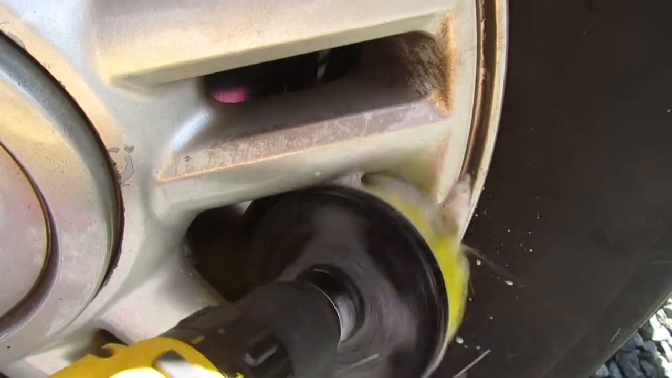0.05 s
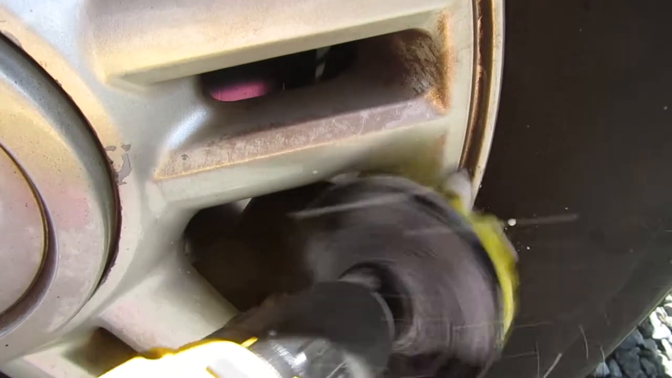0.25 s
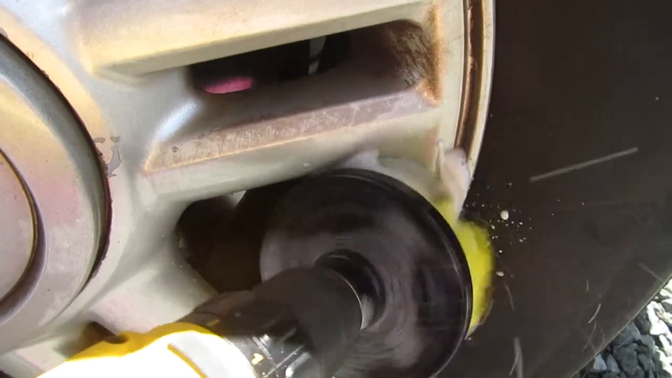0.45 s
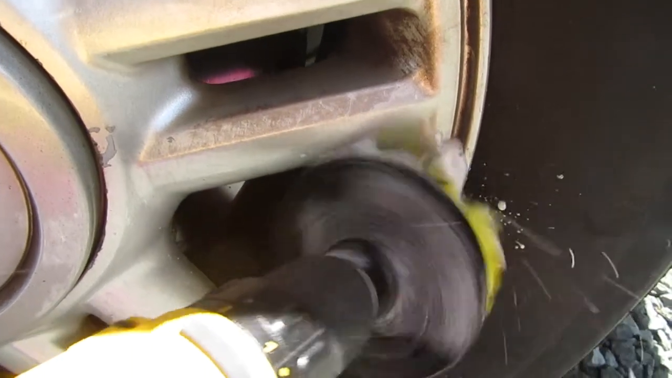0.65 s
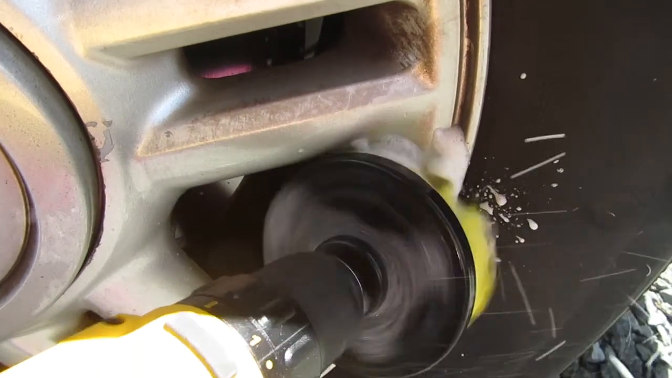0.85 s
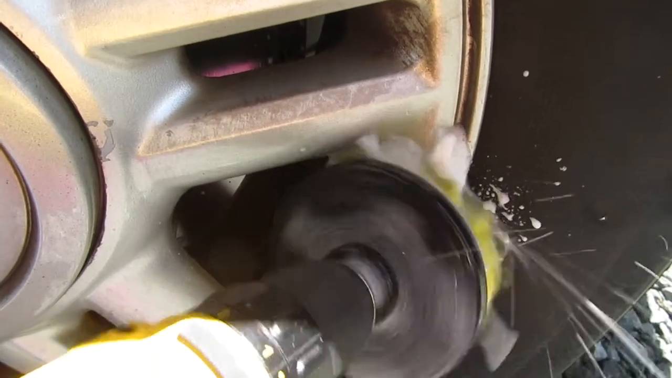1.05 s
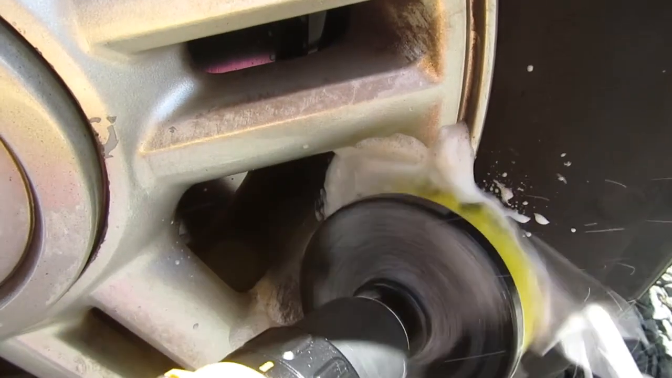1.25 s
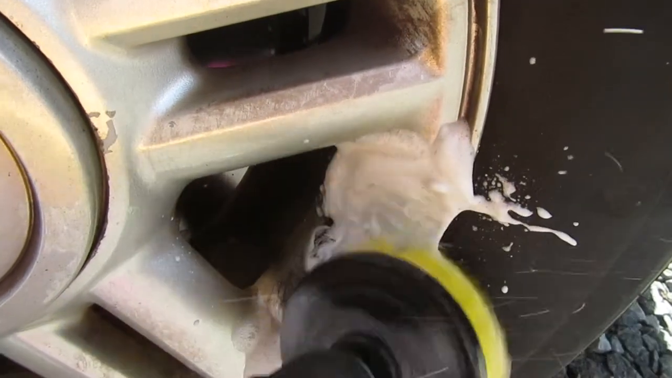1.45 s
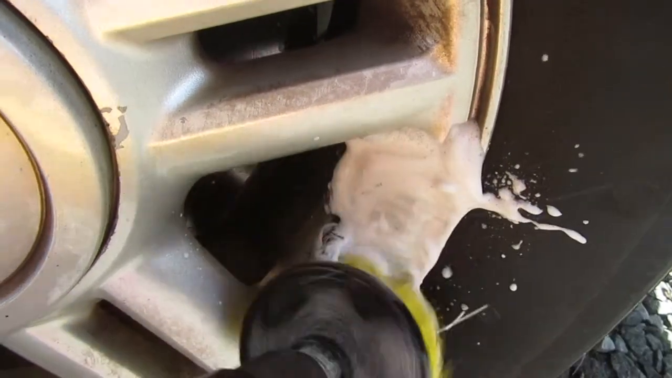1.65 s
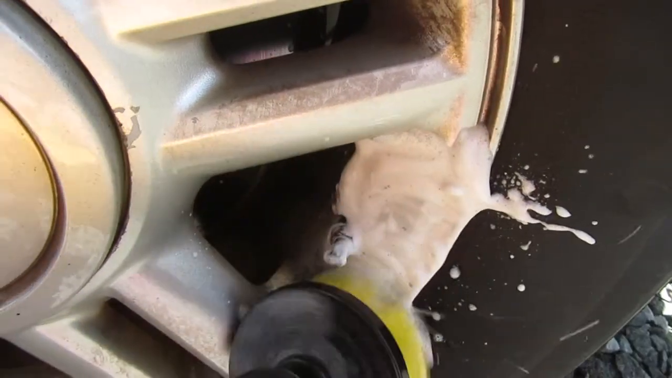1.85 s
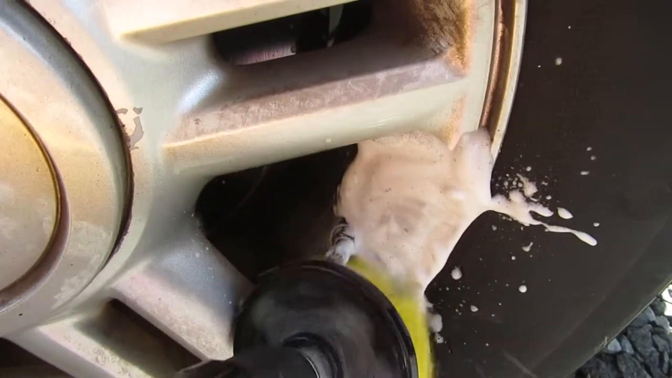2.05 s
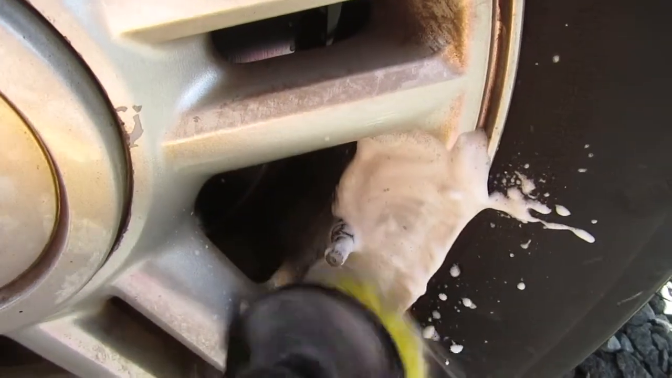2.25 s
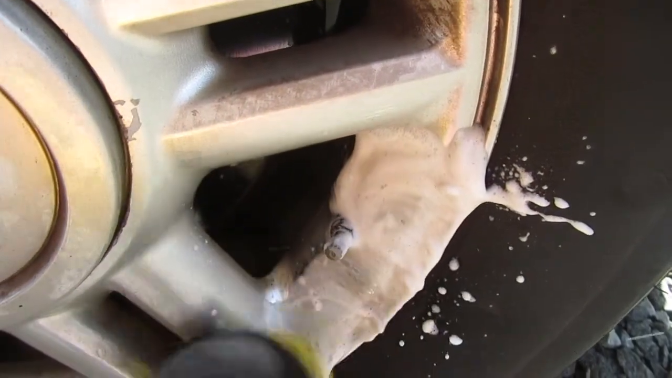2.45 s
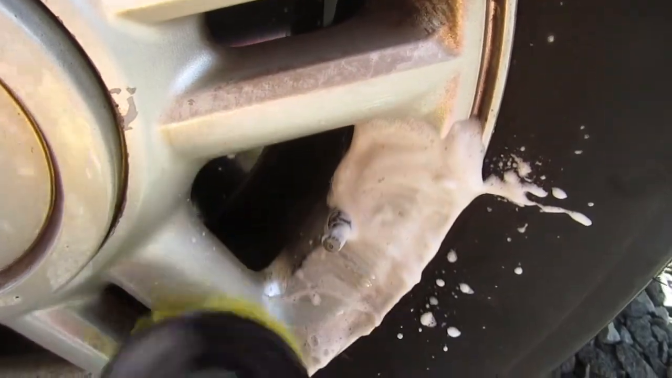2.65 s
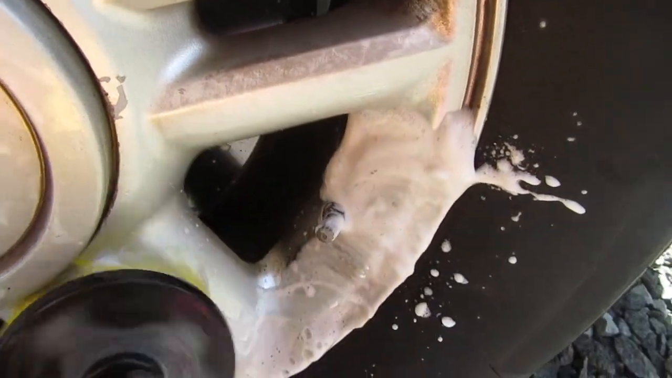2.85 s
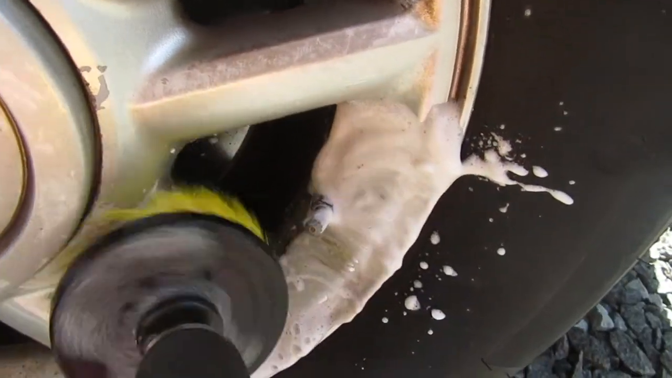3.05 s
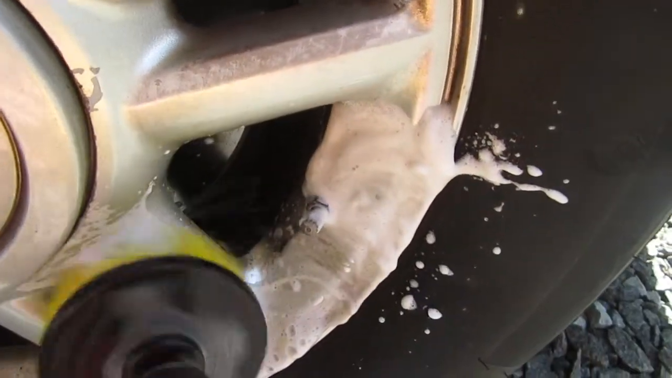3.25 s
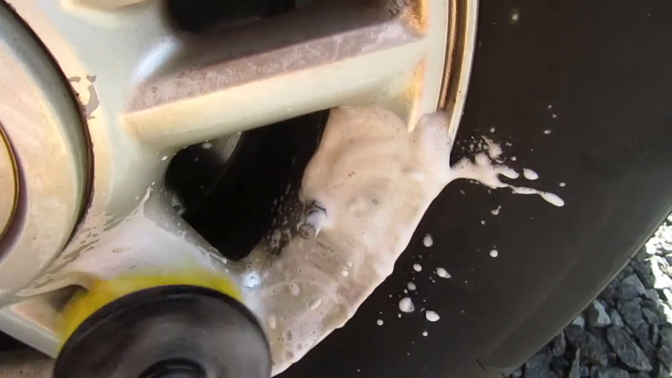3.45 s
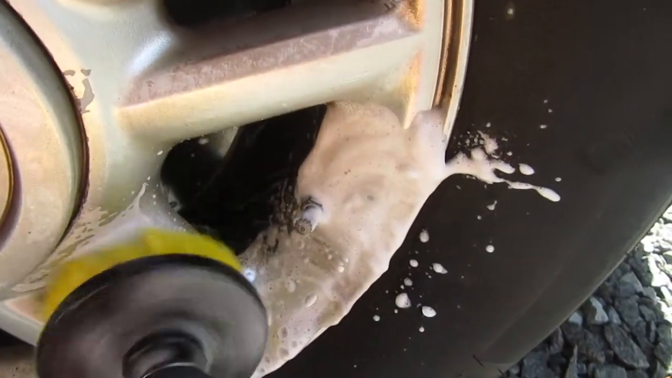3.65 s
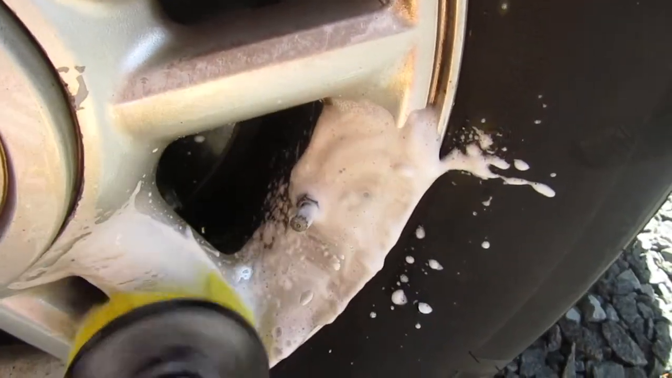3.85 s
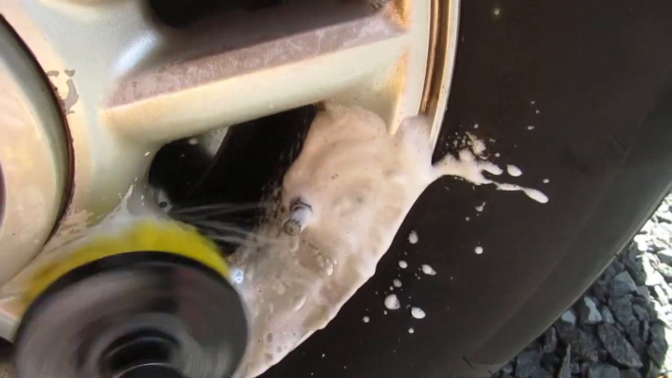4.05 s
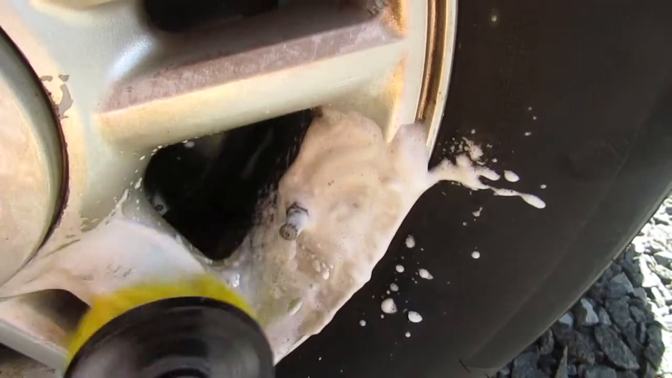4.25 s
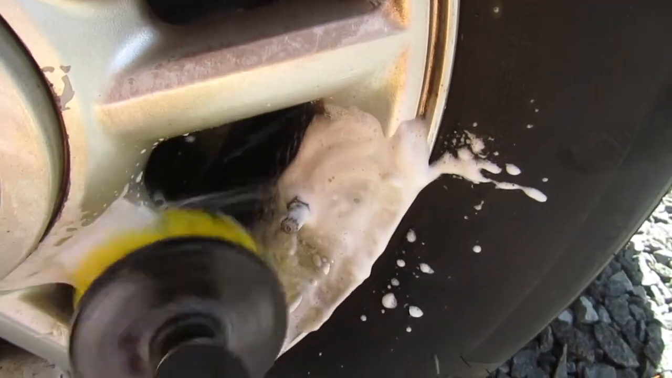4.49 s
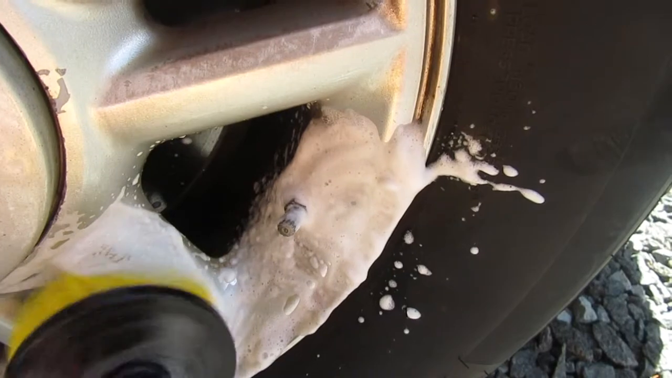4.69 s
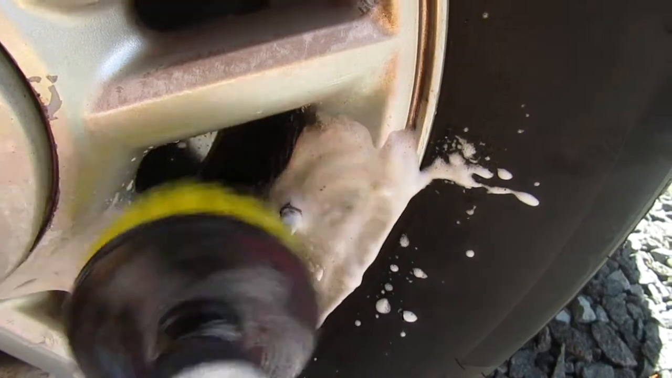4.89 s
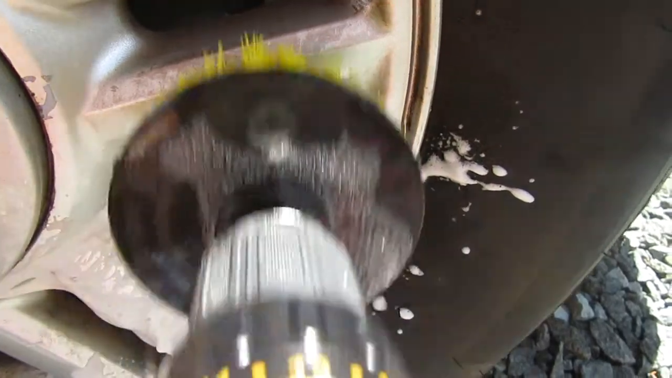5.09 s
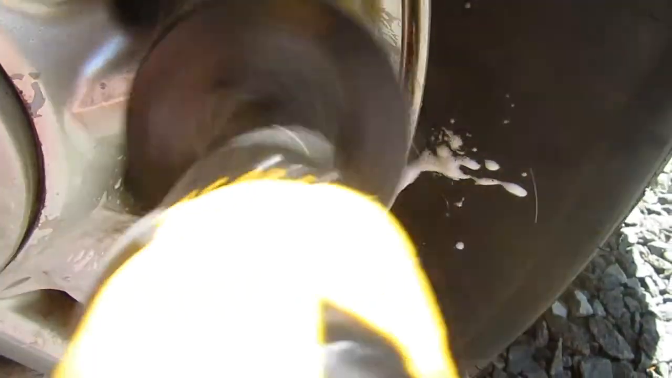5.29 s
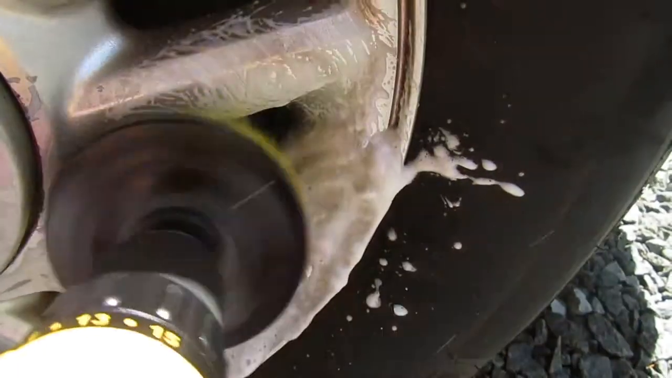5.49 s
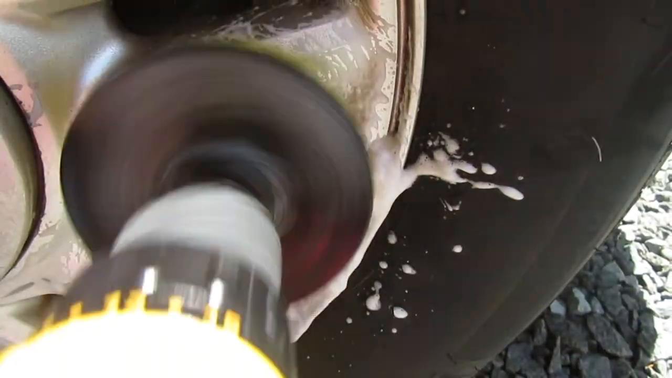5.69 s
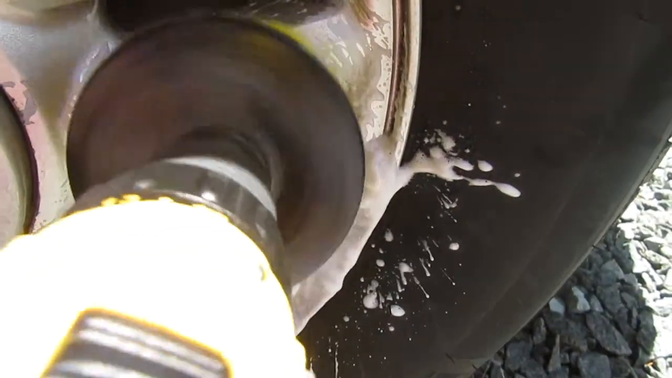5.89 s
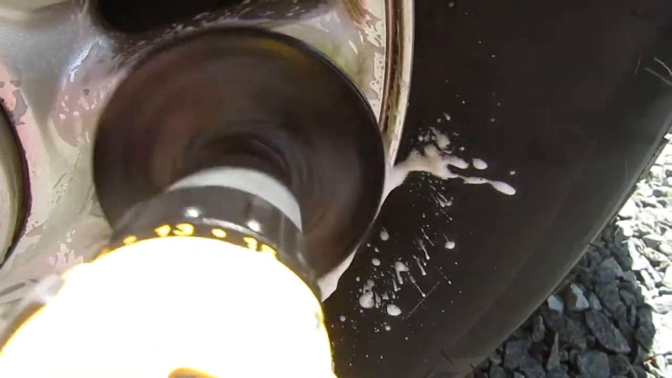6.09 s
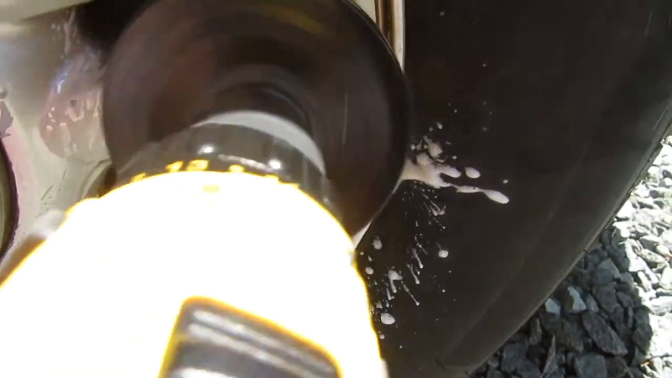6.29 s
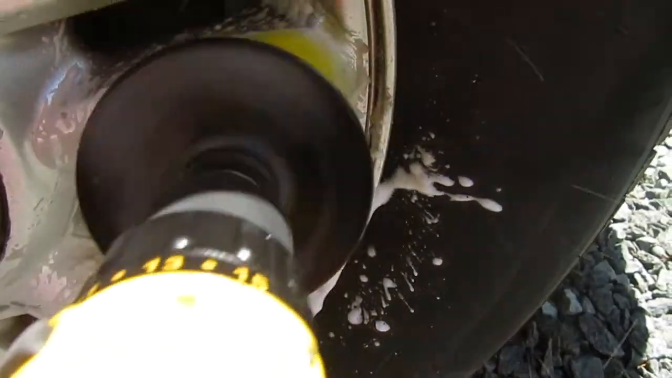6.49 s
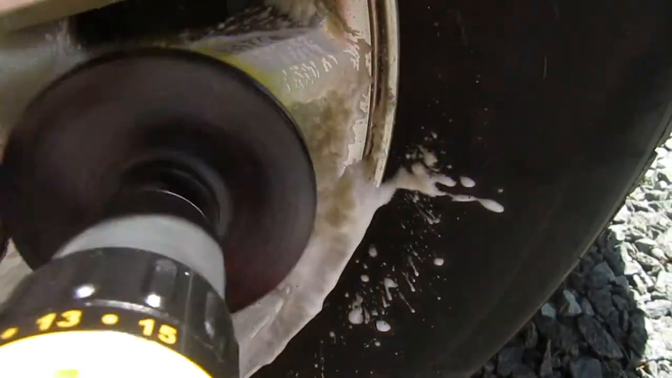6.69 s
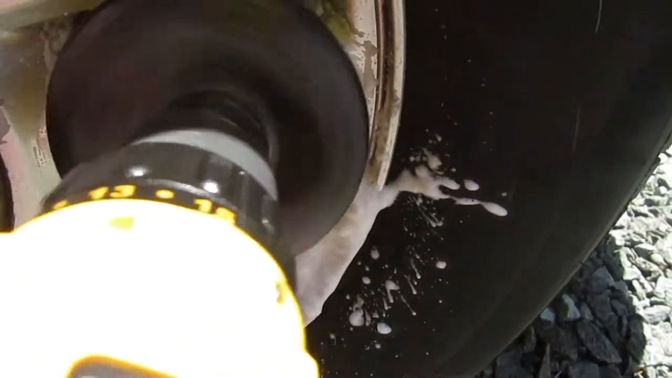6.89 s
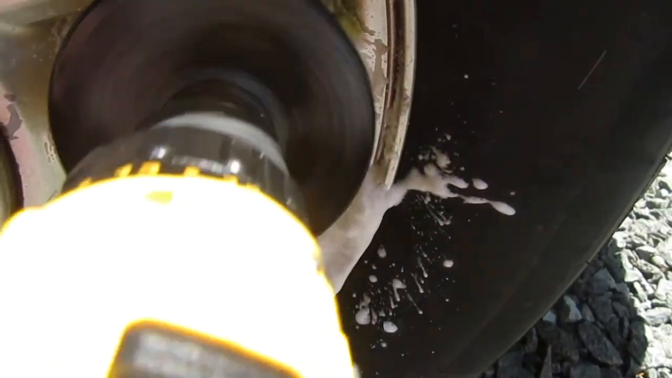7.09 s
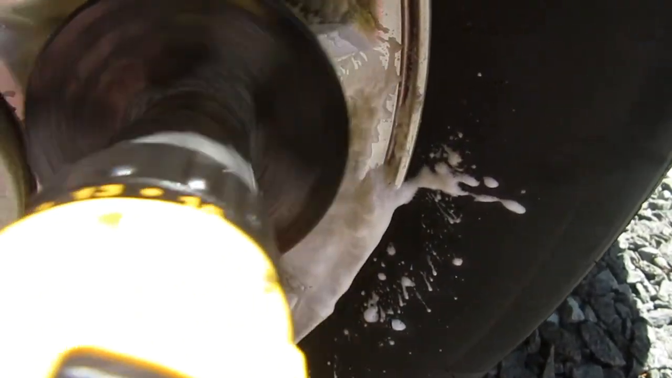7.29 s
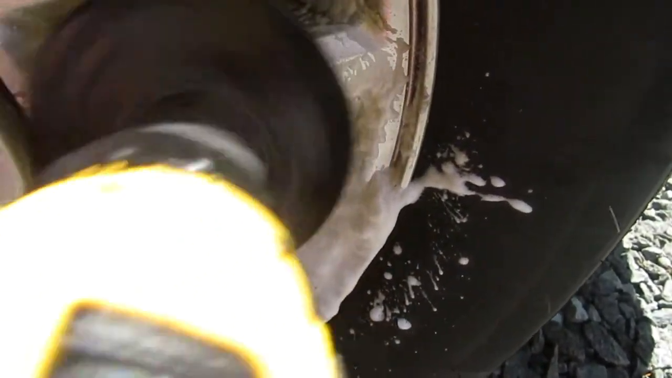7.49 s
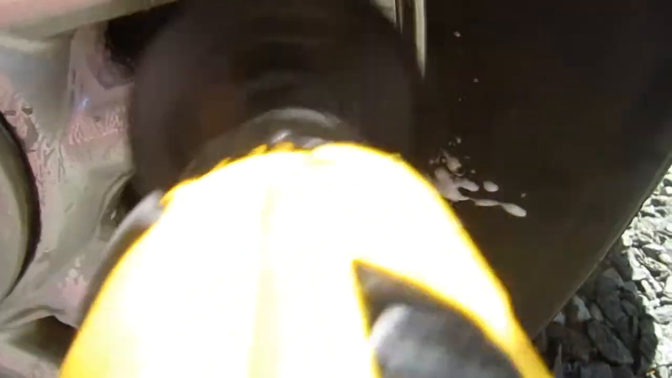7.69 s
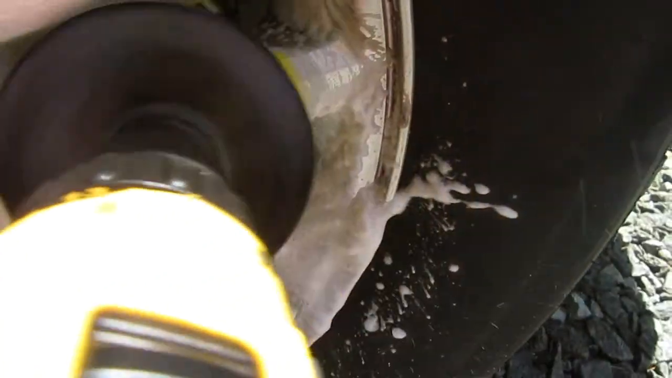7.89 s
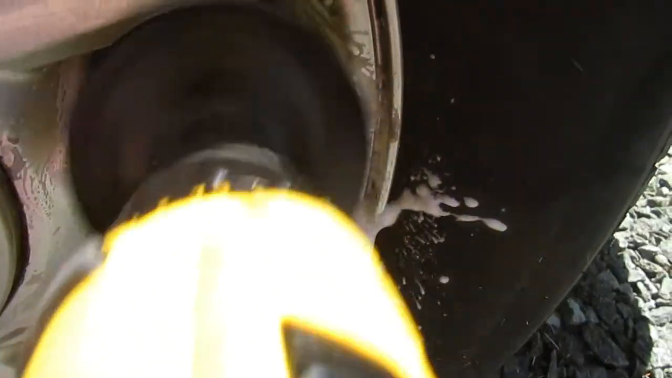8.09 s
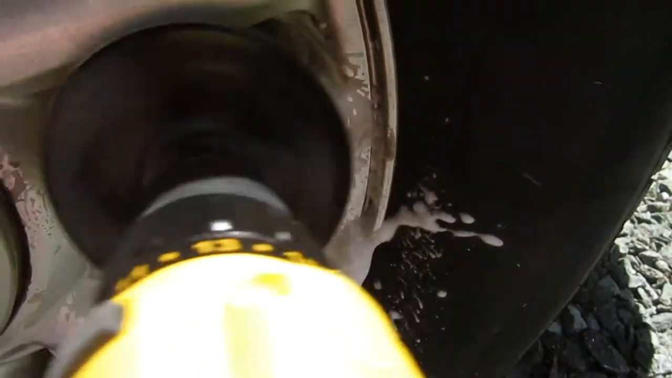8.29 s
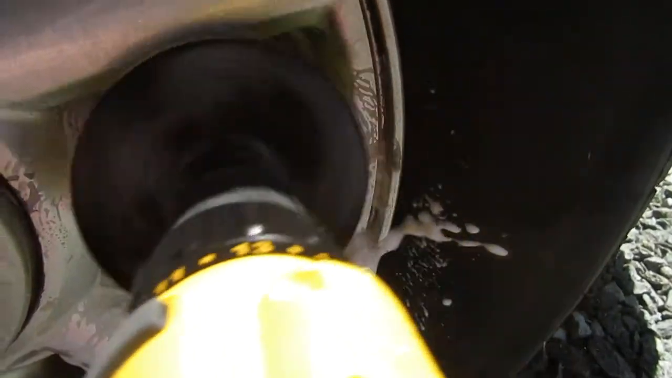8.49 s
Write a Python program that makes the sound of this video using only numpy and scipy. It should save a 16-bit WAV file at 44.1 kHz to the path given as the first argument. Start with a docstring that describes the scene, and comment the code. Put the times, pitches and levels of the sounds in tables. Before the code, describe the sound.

Close to the microphone in a quiet yard, a cordless drill whines over rough gear rattle while wet bristles scrub a car wheel. The pitch sags and climbs with the load, with dry snaps and dull wheel knocks. Near five seconds it suddenly hushes, then restarts higher and steadier, dips once, recovers, and ends with low air buffeting the microphone.

```python
"""A cordless drill spins a wet bristle brush on a soapy car wheel, close to a microphone, over a quiet yard bed.
First the shaft and planet gears whine with motor speed over gear rattle and bristle scrub; knocks ring the wheel.
Just before 5 s the trigger is let go, the drill hushes and a puff of its cooling air hits the microphone.
The speed control sings at 5.15 s; the drill picks up turned away, a second puff follows, a knock lands near 7.6 s.
From 8.38 s the air buffets the microphone in lumpy low noise with sharp slaps."""
import sys
import numpy as np
from scipy import signal
from scipy.fft import rfft, irfft, next_fast_len
from scipy.io import wavfile
from scipy.ndimage import uniform_filter1d, map_coordinates

SR = 44100
rng = np.random.default_rng(int(sys.argv[2]) if len(sys.argv) > 2 else 0)


def dump_mix(stems):
    """Bounce the given channels to the path in sys.argv[1] as a 16-bit WAV at rate SR."""
    frames = np.atleast_2d(stems).T  # one column per channel
    limited = np.clip(frames, -1, 1)  # hard clip at full scale
    pcm = np.round(limited * 32767).astype(np.int16)
    wavfile.write(sys.argv[1], SR, pcm)


N = 376613
T = np.arange(N) / SR

# yard bed, spectrum shape: (f/Hz, relative level/dB)
YARD_SPECTRUM = [(18, -33), (30, -5), (132, -14), (800, -12), (3000, -27.5), (3700, -32), (15000, -35)]
# cooling-air puffs: (t/s, length/s, level/dB)
AIR_PUFFS = [(4.995, .02, -37), (5.284, 0.023, -30)]
# eddies slapping the membrane: (t/s, relative level/dB)
EDDIES = [(8.416, 0), (8.427, -9), (8.437, -4), (8.443, 1), (8.447, 6), (8.469, 0), (8.473, -2),
          (8.477, -7), (8.493, -3), (8.507, -2)]
# buffeting air, spectrum shape: (f/Hz, relative level/dB)
BUFFET_SPECTRUM = [(30, -17), (120, 2.5), (300, -1.5), (1100, -10.5), (2000, -30), (4000, -63)]
# resonances of wheel and tyre: (f/Hz, width/Hz, level/dB)
WHEEL_MODES = [(60, 16, -19), (140, 38, -3), (311, 16, -3.5), (498, 58, -0.5)]
# brush disc knocking the wheel: (t/s, relative level/dB, wheel ring above it/dB)
WHEEL_KNOCKS = [(.39, -17, -2), (1.778, -33, 20), (2.065, -26, 2), (7.621, -14.5, 7)]
# bristles snapping over an edge, and trigger clicks: (t/s, relative level/dB)
SNAP_TIMES = [(0.3974, -7), (0.4589, 4.5), (0.5511, -4), (0.836, -9), (1.0045, 1), (1.0997, 3), (1.1554, 2),
              (1.1844, 0), (1.2014, -5), (1.4103, 2.5), (1.778, -5), (2.0692, 3), (4.9714, -14),
              (4.9834, -8), (5.1108, -34)]
# tone colour of a bristle snap: (f/Hz, gain/dB)
SNAP_RESPONSE = [(500, -44), (1300, 7.5), (3000, -0.5), (7000, -2), (15000, -14)]
# switching tones of the speed control: (f/Hz, relative level/dB)
CHOPPER_TONES = [(3946, -43), (7897, -46)]
# wheel drone, loud while the brush presses on the rim: (t/s, level/dB)
DRONE_LEVEL = [(0, -40.5), (1.4, -46.5), (1.55, -55), (1.75, -62), (1.79, -38.5), (2.3, -40), (2.5, -51.5),
               (4.9, -51.5), (5.25, -40.5), (5.6, -54), (7.3, -50.5), (7.9, -45), (8.54, -47)]
# bristle scrub, spectrum shape: (f/Hz, relative level/dB)
SCRUB_SPECTRUM = [(180, -47), (300, -18.5), (800, -6.5), (1200, -7.5), (1860, -1.5), (3500, -4.5),
                  (5000, -10), (6500, -25), (11000, -120)]
# motor shaft before smoothing: (t/s, turns f/Hz)
SHAFT_SPEED = [(0.0, 181), (0.5, 150.3), (0.71, 148.1), (0.89, 174.2), (1.06, 189.1), (1.22, 183.4),
               (1.4, 197.4), (1.5, 180), (1.68, 163.4), (2.1, 151.8), (2.2, 163.2), (2.41, 229.6),
               (2.52, 241.4), (2.73, 220.5), (2.94, 137), (3.05, 103.9), (3.25, 186.7), (3.4, 220.7),
               (3.78, 253.2), (3.95, 245.7), (4.21, 253.6), (4.52, 260), (4.63, 253.1), (4.81, 265),
               (4.88, 250), (4.94, 222), (4.99, 131), (5.18, 109.7), (5.225, 250), (5.26, 336),
               (5.3, 374.5), (5.5, 391.2), (5.75, 402), (5.9, 363.7), (6.05, 348), (6.33, 353),
               (6.85, 341.3), (7.09, 223), (7.25, 151.8), (7.31, 134.8), (7.37, 185), (7.49, 297.5),
               (7.74, 381.5), (7.84, 389), (8.54, 385)]
# work: (t/s, rattle level at reference speed/dB, scrub above rattle/dB,
# first gear stage above rattle/dB, second stage above rattle/dB)
WORKLOAD = [(0, -20, -4.5, 4.5, -18), (0.37, -18.5, -1, 4.5, -17), (0.65, -19.5, 0, -2, -24),
            (1.0, -18, -0.5, 4.5, -15), (1.22, -17.5, -1, 4.5, -15), (1.42, -19, -3.5, 2, -18),
            (1.54, -23, -8.5, 1, -15), (2.1, -18, -5, -1.5, -15), (2.4, -21, -14, -1.5, -17.5),
            (2.8, -20.5, -9, -4, -24), (3.2, -15.5, -8.5, -1, -21), (3.5, -16, -11.5, -1, -17),
            (4.0, -16.5, -10.5, -1, -20), (4.78, -18, -15, -1, -18.5), (4.9, -17.5, -13.5, -10, -22),
            (5.22, -14.5, -8, -6, -24), (5.35, -18.5, -11, 0, -21.5), (5.58, -20.5, -14, -6.5, -21),
            (5.85, -20.5, -10.5, -0.5, -25), (6.2, -20, -9.5, 1, -19), (6.6, -19, -9.5, 1.5, -17),
            (6.9, -18.5, -12.5, 0, -16.5), (7.15, -17.5, -11, -2, -19), (7.6, -17.5, -10.5, -0.5, -22),
            (8.2, -22.5, -10.5, 3.5, -17), (8.41, -20.5, -10.5, -4, -22), (8.54, -29, -15, 1, -16)]
# shoves of the brush against the wheel: (t/s, length/s, rattle boost/dB)
BRUSH_SHOVES = [(0.397, 0.078, 3.5), (.84, 0.044, 1), (2.28, 0.064, 6), (2.49, 0.084, 5.5),
                (2.85, 0.057, 3.5), (3.313, .1, 1.5), (3.843, .1, 1.5), (4.12, .05, 0.5),
                (4.566, 0.064, 2.5), (4.807, .06, 2.2), (5.36, .08, 2), (5.847, 0.064, 4),
                (6.03, 0.039, 1.5), (6.42, 0.087, 2.5), (6.664, 0.049, 1.5), (7.46, 0.049, 3),
                (7.654, 0.097, 2.5), (8.082, 0.066, 4)]
# gear rattle, drill seen from the side, spectrum shape: (f/Hz, relative level/dB)
RATTLE_SIDE = [(900, -24.5), (1500, -12), (2000, -15.5), (2700, -7.5), (3500, -8.5), (5500, -2.5),
               (7700, -4.5), (12700, -12.5), (15200, -19.5)]
# gear rattle, drill turned away, spectrum shape: (f/Hz, relative level/dB)
RATTLE_AWAY = [(900, -25.5), (1500, -10.5), (3000, -10.5), (4300, -4), (5200, -3), (6600, -3), (8800, -7),
               (12900, -15.5), (15200, -23)]
# shaft orders: (multiple of shaft speed, offset/dB, offset turned away/dB, flutter/dB)
SHAFT_ORDERS = [(1, 2.5, 3, 2.2), (2, -22, -8, 3.5), (3, -3, -4, 2.5), (4, -8.5, -5.5, 3)]
# housing resonance under the shaft orders: (f/Hz, level above rattle/dB)
HOUSING = [(100, -67), (200, -34), (380, -26), (480, -26), (640, -15.5), (800, -25), (950, -35.5),
           (1150, -23.5), (1400, -18), (1600, -26)]
# second gear stage: (multiple of its tooth rate, relative level/dB)
SECOND_STAGE = [(2, -1.5), (3, 0), (4, -0.5), (5, -7), (6, -13)]
# how the gear case passes a gear line: (f/Hz, gain/dB)
CASE_RESPONSE = [(1300, 2), (1650, -2), (2000, 1.5), (2400, -2.5), (2800, -0.7), (3400, -4), (4200, 2.5),
                 (4800, 2.5), (5500, 2.5), (6500, -3), (8500, 3)]
# rotor slots and fan blades: (multiple of shaft speed, level above rattle/dB)
ROTOR_LINES = [(15, -32), (18, -30), (20, -38), (29, -27)]
# housing resonances that fast teeth excite: (f/Hz, relative level/dB)
VENT_MODES = [(7150, -12), (8800, -15.5), (12500, -25)]

# events per shaft turn: teeth meeting, planets passing, the carrier's beat, second-stage teeth
MESH, PLANET, CARRIER, SECOND_MESH = 10.83, 0.635, 0.367, 3.1
# gear lines: (relative level/dB, relative level turned away/dB)
MESH_DB, PLANET_DB, OVERTONE_DB, THIRD_DB = (-13, -16), (-16, -11.5), (-13, -12.5), (-12.5, -30)
PLANET_FULL_HZ = 260  # shaft speed from which the planets sing fully
TEETH_PULL = 0.08  # share of the current surge that loads the teeth
INERTIA_S = 0.03  # the rotor rounds off every change of speed
REFERENCE_HZ, RATTLE_DB_PER_OCTAVE = 250, 3.5  # faster gears rattle louder
RELEASE_S, BRAKE_DB_PER_S = 4.945, 598  # trigger let go
PICKUP_S, RISE_DB_PER_S = 5.21, 676  # drill picks up again
STILL_DB, SCRUB_LINGERS_DB = -46.5, 16  # drop of the rattle; bristles still drag while gears are quiet
SIDE_ON = T < 5.1  # afterwards the drill is turned away
BUFFET_S, BUFFET_ATTACK_S, BUFFET_DB, BUFFET_FADE_DB_PER_S = 8.38, 0.043, -13.5, 65
YARD_DB = -50.5
TOP_HZ = 15080


def amp(db):
    """Gain of a level in dB."""
    return 10 ** (np.asarray(db) / 20)


def unit(x):
    """x at rms 1."""
    return x / np.sqrt(np.mean(np.abs(x) ** 2) + 1e-20)


def along(points, hz):
    """(f/Hz, value) points read on a log frequency axis."""
    f, value = np.transpose(points)
    return np.interp(np.log(hz + 1), np.log(f + 1), value)


def curves(rows):
    """One value per sample for each column after the time."""
    s, *columns = np.transpose(rows)
    return [np.interp(T, s, column) for column in columns]


def wobble(rate):
    """A smooth random curve, rate knots a second."""
    knots = rng.standard_normal(int(N * rate / SR) + 4)
    return map_coordinates(knots, [T * rate], order=2)


def filtered(x, response):
    """x shaped by a response of frequency."""
    m = next_fast_len(N + SR // 2)
    return irfft(rfft(x, m) * response(np.fft.rfftfreq(m, 1 / SR)), m)[:N]


def noise(spectrum, patchy_db):
    """Coloured noise of rms 1 with time-frequency patches of random gain."""
    grid = signal.stft(rng.standard_normal(N + 512), nperseg=512)[2]
    patches = uniform_filter1d(rng.standard_normal(grid.shape), 8, 0)
    patches = unit(uniform_filter1d(patches, 10, 1))
    white = signal.istft(grid * amp(patchy_db * patches), nperseg=512)[1][:N]
    return unit(filtered(white, lambda hz: amp(along(spectrum, hz))))


def bumps(rows):
    """Gaussian swells: one pair of (centre, length) and a height per row."""
    return sum(height * np.exp(-((T - s) / length) ** 2) for s, length, height in rows)


def yard():
    """Steady coloured noise as the outdoor bed."""
    return amp(YARD_DB) * noise(YARD_SPECTRUM, patchy_db=0.5)


def puffs():
    """Cooling air puffs as short swells of low thump on the microphone."""
    thump = noise([(25, -0.5), (90, -7), (200, -8), (500, -40)], patchy_db=3.5)
    return thump * bumps([(s, length, amp(db)) for s, length, db in AIR_PUFFS])


def buffeting():
    """Lumpy air noise swells fast and fades slowly on the microphone."""
    attack = np.clip((T - BUFFET_S) / BUFFET_ATTACK_S, 0, 1) ** 2
    fade_s = np.clip(T - BUFFET_S - BUFFET_ATTACK_S, 0, 1)
    blowing = attack * amp(BUFFET_DB - BUFFET_FADE_DB_PER_S * fade_s)
    return blowing * unit(amp(1.8 * wobble(150)) * noise(BUFFET_SPECTRUM, patchy_db=1.0))


def slaps():
    """Single eddies slap the membrane: a steep push, then a slower suck."""
    out = np.zeros(N)
    u = np.arange(SR // 100) / SR / 0.00022  # time in units of 0.22 ms
    shape = u * (1 - u / 4) * np.exp(-u / 1.53)
    for s, db in EDDIES:
        out[round(s * SR):][:len(u)] += amp(db + 6.5) * shape
    return out


def wheel(hz):
    """Response of the wheel and tyre as resonances of alternating sign."""
    response = 0
    for k, (centre, width, db) in enumerate(WHEEL_MODES):
        damping = 1j * hz * width
        response = response + (-1) ** k * amp(db) * damping / (centre ** 2 - hz ** 2 + damping)
    return response


def snap_response(hz):
    """Gain that colours bristle snaps."""
    return amp(along(SNAP_RESPONSE, hz))


def knocks():
    """Decaying noise blows give a dull thud and ring the wheel."""
    thuds, rings, t = np.zeros(N), np.zeros(N), np.arange(SR // 20) / SR
    for s, db, ring_db in WHEEL_KNOCKS:
        blow = amp(db + 16 - 60 * t / 0.017) * rng.standard_normal(len(t))  # 60 dB down in 17 ms
        thuds[round(s * SR):][:len(t)] += blow
        rings[round(s * SR):][:len(t)] += amp(ring_db) * blow
    dull = lambda hz: 1 / (1 + 1j * hz / 900) ** 2
    return filtered(thuds, dull) + filtered(rings, wheel)


def ticks():
    """Bristle snaps and trigger clicks as dry bursts, 60 dB down in 12 ms."""
    snaps, t = np.zeros(N), np.arange(SR // 20) / SR
    for s, db in SNAP_TIMES:
        snaps[round(s * SR):][:len(t)] += amp(db - 6 - 60 * t / 0.012) * rng.standard_normal(len(t))
    return filtered(snaps, snap_response)


def chopper():
    """The speed control sings steady tones for a moment before the motor picks up."""
    on = np.interp(T, [5.148, 5.152, 5.175, 5.19], [0, 1, 1, 0])
    return on * sum(amp(db + 4) * np.sin(2 * np.pi * hz * T) for hz, db in CHOPPER_TONES)


def drone():
    """Unsteady noise through the wheel's resonances hums under the brush."""
    ringing = filtered(rng.standard_normal(N), wheel)
    return amp(curves(DRONE_LEVEL)[0]) * unit(amp(3.9 * wobble(30)) * ringing)


def scrub(press_db):
    """Bristle friction as noise that follows contact pressure, with dense flicked grains; rms 1."""
    flicks = (rng.random(N) < 90 / SR) * rng.standard_normal(N)  # about 90 a second
    flicks = unit(filtered(flicks, snap_response))
    friction = noise(SCRUB_SPECTRUM, patchy_db=1.4) + 0.28 * flicks
    return unit(amp(1.53 * press_db + 1.5 * wobble(150)) * friction)


def rattle(turns, press_db):
    """Gear noise that beats with planet passes, carrier and shaft turns; rms 1."""
    cycle = lambda multiple: np.cos(2 * np.pi * multiple * turns)
    beat_db = 1.2 * cycle(PLANET) + 0.59 * cycle(CARRIER) + 0.68 * cycle(1)
    side, away = noise(RATTLE_SIDE, patchy_db=1.5), noise(RATTLE_AWAY, patchy_db=1.35)
    return unit(amp(beat_db + press_db) * np.where(SIDE_ON, side, away))


def effort(hz):
    """Rattle grows with speed and with each shove, and drops while the trigger is let go."""
    rattle_db, scrub_db, *stages_db = curves(WORKLOAD)
    braking_db = BRAKE_DB_PER_S * (RELEASE_S - T)
    rising_db = RISE_DB_PER_S * (T - PICKUP_S)
    on_db = np.clip(np.maximum(braking_db, rising_db), STILL_DB, 0)
    speed_db = RATTLE_DB_PER_OCTAVE * np.log2(hz / REFERENCE_HZ)
    rattle_db = rattle_db + speed_db + bumps(BRUSH_SHOVES) + on_db
    return rattle_db, scrub_db + np.minimum(-2 * on_db, SCRUB_LINGERS_DB), *stages_db


def acceleration(hz, window):
    """Smoothed change of shaft speed in Hz per second."""
    return uniform_filter1d(np.gradient(hz) * SR, size=window)


def tone(turns, multiple, flutter_db):
    """A sine locked to the shaft, rms 1 before its strength flutters."""
    sine = np.sin(2 * np.pi * (multiple * turns + rng.random()))
    return np.sqrt(2) * amp(flutter_db * wobble(25)) * sine


def band(phase, width):
    """A line smeared into a noise band by a random complex envelope; phase in turns."""
    return np.real((wobble(width) + 1j * wobble(width)) * np.exp(2j * np.pi * phase))


def shaft_orders(hz, turns, load_db, pull_db):
    """The housing lifts whichever shaft order crosses its resonance; order 3 takes the current surge."""
    out = np.zeros(N)
    for multiple, side_db, away_db, flutter_db in SHAFT_ORDERS:
        k = round(multiple)
        level_db = load_db + np.where(SIDE_ON, side_db, away_db) + along(HOUSING, k * hz)
        out += amp(level_db + (k == 3) * pull_db) * tone(turns, k, flutter_db)
    return out


def rotor(hz, turns, load_db):
    """Rotor slots and fan blades add high lines that grow with speed."""
    lines = sum(amp(load_db + db) * tone(turns, round(k), flutter_db=3) for k, db in ROTOR_LINES)
    return np.clip(hz / 300, 0, 1) ** 2 * lines


def vents(hz, load_db):
    """Fast teeth excite fixed housing resonances, heard only while the drill is side-on."""
    bands = sum(amp(load_db + db) * band(vent_hz * T, width=500) for vent_hz, db in VENT_MODES)
    return np.clip(hz / 240, 0, 1) ** 6 * SIDE_ON * bands


def gears(hz, turns, load_db, pull_db, first_db, second_db):
    """Two stages of tooth lines through the gear case, with overtones smeared into moving bands."""
    def level(k, db):
        case_db = along(CASE_RESPONSE, k * hz)
        return amp(load_db + db + TEETH_PULL * pull_db + case_db + 1.27 * wobble(4))

    first = lambda k, db: level(k, first_db + np.where(SIDE_ON, *db))
    passed = lambda k: 1 / (1 + (k * hz / 7500) ** 12)  # the housing holds back the highest overtones
    side, double, third = MESH + PLANET, 2 * MESH, 3 * MESH + PLANET
    planet = first(side, PLANET_DB) * np.clip(hz / PLANET_FULL_HZ, 0, 1) ** 2.2
    out = first(MESH, MESH_DB) * tone(turns, MESH, flutter_db=2.0)
    out += planet * tone(turns, side, flutter_db=4.0)
    out += amp(-2.0) * planet * band(side * turns, width=760)  # rough skirt of the mesh
    for multiple, db in SECOND_STAGE:
        k = round(multiple) * SECOND_MESH
        rising = np.clip(k * hz / 2400, 0, 1) ** 2
        out += level(k, second_db + db) * rising * tone(turns, k, flutter_db=2.5)
    coasting = amp(np.clip(acceleration(hz, SR // 16) / 70, -5, 0))  # softer while slowing
    overtones = band(double * turns, width=130) + 0.99 * band((double + PLANET) * turns, width=90)
    out += first(double, OVERTONE_DB) * coasting * passed(double) * overtones
    out += first(third, THIRD_DB) * passed(third) * band(third * turns, width=260)
    return out


def whine(hz, turns, rattle_db, first_db, second_db):
    """Shaft, gears, rotor and vents sing with motor speed and load."""
    load_db = uniform_filter1d(rattle_db, size=SR // 30)
    pull_db = np.clip(acceleration(hz, SR // 50) / 200, 0, 14)  # current surges on speeding up
    engaged = np.clip(hz / 165, 0, 1) ** 4  # slow gears barely sing
    high = gears(hz, turns, load_db, pull_db, first_db, second_db)
    high += rotor(hz, turns, load_db) + vents(hz, load_db)
    return shaft_orders(hz, turns, load_db, pull_db) + engaged * high


def drill():
    """One shaft speed and one brush pressure drive rattle, scrub, wheel drone and whine."""
    hz = uniform_filter1d(curves(SHAFT_SPEED)[0], size=round(INERTIA_S * SR), mode="nearest")
    turns = np.cumsum(hz) / SR
    rattle_db, scrub_db, *stages_db = effort(hz)
    press_db = 0.4 * wobble(12) + 0.74 * wobble(40) + 0.54 * wobble(300)  # uneven contact of the brush
    body = amp(rattle_db - 1.68) * rattle(turns, press_db)
    body += amp(rattle_db + scrub_db - 2.04) * scrub(press_db)
    running = np.clip(amp(rattle_db + 37), 0, 1)  # drone and whine sink further once rattle is below -37 dB
    return body + running * (drone() + whine(hz, turns, rattle_db, *stages_db))


def scene():
    """One microphone feeds both channels."""
    air = puffs() + buffeting() + slaps()
    mono = yard() + air + knocks() + ticks() + chopper() + drill()
    return np.tile(mono, (2, 1))


def record(dry):
    """Peaks round off towards full scale, then everything from the band limit up is cut."""
    soft = dry[0] / (1 + np.abs(dry[0]) ** 6) ** (1 / 6)
    return np.tile(filtered(soft, lambda hz: hz < TOP_HZ), (2, 1))


dry = scene()
out = record(dry)
dump_mix(out)
```